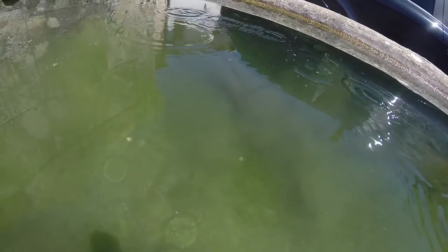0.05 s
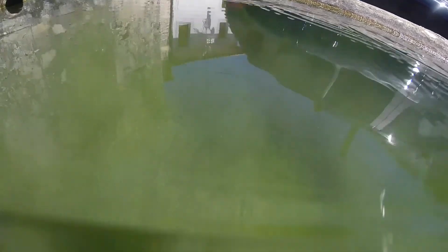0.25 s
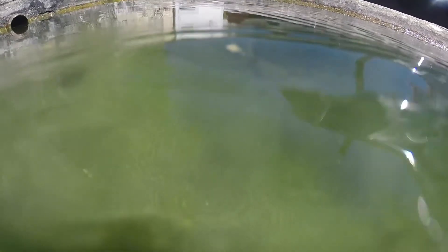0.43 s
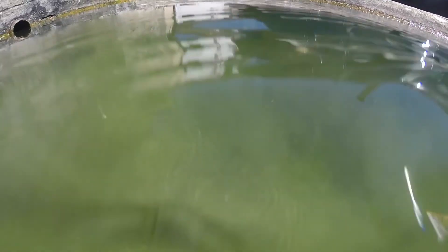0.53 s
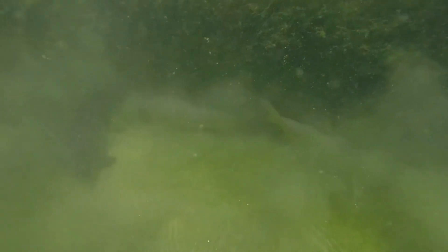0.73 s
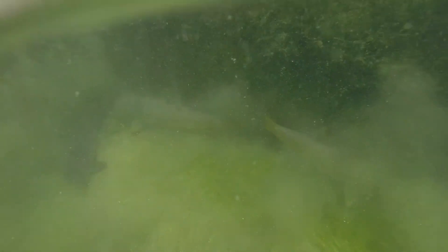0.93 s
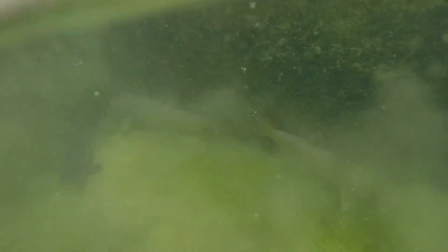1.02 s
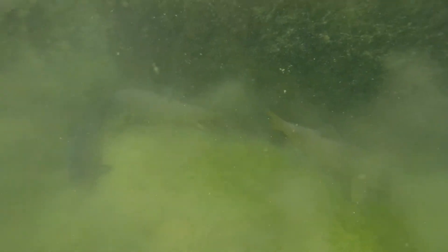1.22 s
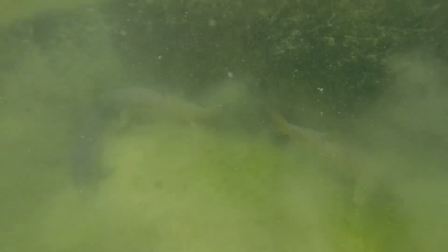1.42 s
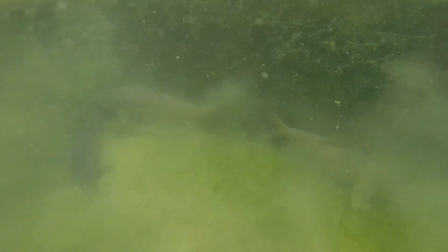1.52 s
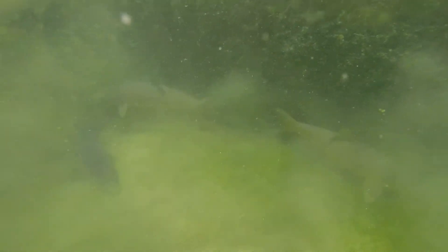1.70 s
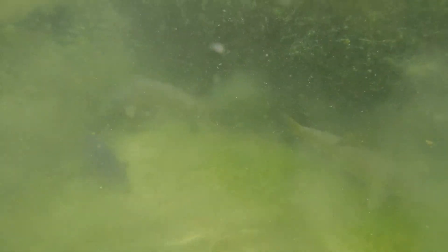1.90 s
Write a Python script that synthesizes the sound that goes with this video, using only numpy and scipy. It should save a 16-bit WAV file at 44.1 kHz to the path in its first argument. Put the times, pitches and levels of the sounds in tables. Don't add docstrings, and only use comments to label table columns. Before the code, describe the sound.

Plastic camera housing being bumped, heard from inside: dull low knocks and small creaky ticks from 0 to 0.25 s, then a cluster of clicks peaking in a very loud, dry double crack at 0.3 s. A faint thin air whistle at 0.4-0.5, a tiny bubble blip at 0.54, a softer knock and clicks at 0.65-0.8, one faint tick at 1.23. Beneath, dark muffled water hush, slight rumble and hiss until about 2 s.

```python
import sys
import numpy as np
from scipy import signal
from scipy.fft import rfft, irfft
from scipy.io import wavfile

SR = 44100
rng = np.random.default_rng(int(sys.argv[2]) if len(sys.argv) > 2 else 0)


def wav_out(sig):
    wavfile.write(sys.argv[1], SR, np.round(np.clip(np.atleast_2d(sig).T, -1, 1) * 32767).astype(np.int16))


def to_linear_factor(level_db):
    exponent = np.asarray(level_db, float) / 20
    return 10 ** exponent


N = 85995


def rms_one(x):
    return x / np.sqrt(np.mean(x ** 2) + 1e-20)


def in_time(rows):
    s, *columns = np.transpose(rows)
    return [np.interp(np.arange(N) / SR, s, column) for column in columns]


def drift(rate_hz):
    r = np.exp(-80 * np.pi * rate_hz / SR)
    white = rng.standard_normal(N // 40 + 2002)
    slow = signal.lfilter([1], [1, -2 * r, r * r], white)[2000:]
    return np.interp(np.arange(N) / 40, np.arange(len(slow)), rms_one(slow))


def ring(clicks, hz, t60):
    r = to_linear_factor(-60 / (t60 * SR))
    w = 2 * np.pi * hz / SR
    return signal.lfilter([0, np.sin(w)], [1, -2 * r * np.cos(w), r * r], clicks)


def bandpass(x, edges_hz):
    return signal.sosfilt(signal.butter(2, edges_hz, "band", fs=SR, output="sos"), x)


def steep_band(x, low_hz, high_hz):
    hz = np.arange(N // 2 + 1) * SR / N
    return irfft(rfft(x) * ((hz >= low_hz) & (hz < high_hz)), N)


def banded_noise(spectrum, patchy_db, rate_hz):
    out, together = 0, drift(rate_hz)
    edges = 18 * 2 ** np.arange(0, 10, 1 / 3)
    white = rng.standard_normal((2, N + SR))
    hz, db = np.transpose(spectrum)
    for k, (low, high) in enumerate(zip(edges, edges[1:])):
        band = bandpass(white[k % 2], [low, high])[SR:]
        level_db = np.interp(np.log(low * high) / 2, np.log(hz), db)
        flicker = .7 * together + drift(rate_hz)
        out = out + band * to_linear_factor(level_db + patchy_db * flicker)
    return rms_one(out)


# (time [s], peak level [dB], centre [Hz], width [octaves], length [s])
BUMP_TICKS = [(.0777, -31.5, 1520, 1.65, 0.0033), (.1486, -35.5, 1250, 0.65, .005),
              (.157, -35, 1770, 0.92, 0.0068), (.183, -40.5, 1380, .6, 0.0074),
              (.188, -49.5, 2330, 0.62, 0.013), (.207, -41, 2390, 0.55, .003),
              (.248, -33.5, 8850, 0.68, 0.0016), (.248, -28.5, 2006, 1.5, 0.018),
              (.2525, -33.5, 4508, 0.63, 0.0038), (.267, -20, 3000, .9, .003),
              (.273, -31, 4970, 1.4, 0.004), (.284, -25, 4130, 1.2, 0.004), (.29, -21, 7630, .3, .001),
              (.29, -15.5, 3400, 0.6, 0.0012), (.2918, -23, 6000, 1.1, 0.0016),
              (.2937, -15, 1415, 1, .00006), (.2996, -13.5, 3016, 0.84, .00006),
              (.2985, -26.5, 3400, 0.38, .0005), (.3026, -21, 2690, .6, .004)]
# (time [s], peak level [dB], centre [Hz], width [octaves], length [s])
LATER_TICKS = [(.416, -68, 5600, .4, .008), (.4294, -44.5, 900, 0.86, 0.0066),
               (.475, -63, 6000, 1.1, 0.0024), (.494, -49, 5460, 0.87, 0.0019),
               (.5023, -43.5, 1240, 1.6, 0.011), (.5445, -56, 2270, 0.43, 0.0024),
               (.563, -47.5, 1800, 1.27, 0.0073), (.601, -39, 1500, 1.26, 0.0037),
               (.616, -44, 1322, .9, 0.0013), (.649, -34.5, 902, 1.1, 0.0048),
               (.659, -30, 880, 0.68, 0.0078), (.6732, -33, 8020, 0.37, 0.0025),
               (.6732, -32, 4900, 0.33, 0.0017), (.67, -35.5, 1520, 0.66, 0.01),
               (.688, -41, 1500, 0.94, 0.018), (.7477, -46.5, 1110, 0.54, 0.0045),
               (.784, -29, 3060, 1.5, 0.00065), (1.2272, -43.5, 2930, 1.1, 0.003)]
# (pitch [Hz], level [dB], t60 [s])
SHELL_MODES = [(330, -3, .02), (620, -2, .009), (900, -2, .012), (1200, 0, .014), (1500, -3, .008),
               (1820, -8, .025), (2200, -2, .011), (2650, -1, .01), (3450, 1, .009), (4200, -1, .009),
               (4900, -3, .008), (5800, -8, .011), (7200, 0, .007), (9900, -4, .006)]
SLIPS_PER_S, FIRST_SLIP = 6300, 2.5
SKIRT_DB, SHELL_TOP_HZ = -18, 17000
CRACK_DB, CRACK_S = -28.5, .004


def housing(table, size=4000):
    out, t = np.zeros(N + size), np.arange(size) / SR
    for s, db, hz, octaves, length in table:
        luck, sizes = rng.random(size), rng.standard_normal(size)
        share_db = rng.normal(0, 2, len(SHELL_MODES))
        slips = (luck < SLIPS_PER_S / SR) * sizes + FIRST_SLIP * (t == 0)
        slips = slips * np.exp(-(t / length) ** 2)
        tick = np.zeros(size)
        for (mode_hz, mode_db, t60), own_db in zip(SHELL_MODES, share_db):
            off_centre_db = 6 * (np.log2(mode_hz / hz) / octaves) ** 2
            tick += to_linear_factor(mode_db + own_db - off_centre_db) * ring(slips, mode_hz, t60)
        edges = np.clip(hz * 2. ** np.array([-octaves, octaves]), 50, SHELL_TOP_HZ)
        tick = bandpass(tick, edges) + to_linear_factor(SKIRT_DB) * tick
        crack = to_linear_factor(CRACK_DB) * np.exp(-t / CRACK_S) * np.diff(slips, prepend=0)
        start = int(s * SR)
        out[start:start + size] += to_linear_factor(db) * (tick / np.abs(tick).max() + crack)
    out = out[:N] + to_linear_factor(-62) * ring(out[:N], hz=1815, t60=.2)
    return signal.sosfilt(signal.butter(2, SHELL_TOP_HZ, fs=SR, output="sos"), out)


# (time [s], peak level [dB], pitch [Hz], rise [s], fall [s])
BODY_KNOCKS = [(.001, -32, 41.8, 0.0046, 0.078), (0.025, -40, 27, 0.01, 0.0067),
               (0.0491, -19, 296, 0.0054, 0.0053), (0.055, -22, 307, 0.006, 0.0017),
               (0.2909, -18, 210, 0.0022, 0.001), (.072, -32, 344, .008, .025),
               (0.093, -32.5, 55.4, 0.0053, 0.04), (.127, -33, 323, 0.015, 0.0077),
               (0.15, -22, 130, 0.0034, 0.0058), (.156, -28.5, 324, 0.0035, 0.0039),
               (.112, -37, 380, 0.0051, .01), (.178, -38.5, 350, 0.0058, .012),
               (.173, -31.5, 50.3, 0.0052, 0.024), (.238, -23, 144.4, 0.002, 0.015),
               (0.231, -18, 50.4, 0.056, 0.0026), (0.298, -25, 139.5, .004, 0.0093),
               (0.47, -45, 306, 0.0039, 0.0033), (0.506, -43.5, 124, 0.0062, 0.012),
               (0.46, -41, 39.5, 0.013, 0.014), (0.659, -25, 256, 0.0015, 0.0047),
               (0.657, -22, 44.5, 0.015, 0.015), (0.698, -30.5, 122, 0.0017, 0.0046),
               (0.748, -39, 110, 0.0065, 0.013)]
# (time [s], peak level [dB], pitch [Hz], rise [s], fall [s])
PANEL_SNAPS = [(.0777, -32.5, 1870, 0.0012, 0.0029), (.0777, -34, 1230, 0.0012, 0.0038),
               (.0777, -37, 930, 0.00089, 0.0054), (.078, -42.5, 2480, .001, 0.0034),
               (.158, -43.5, 2500, 0.0025, 0.0031), (.158, -40, 1240, .002, 0.0045),
               (.184, -41, 1220, .003, .012), (.267, -22, 2900, 0.00028, .001),
               (.267, -37, 9900, .0004, .0006), (.269, -43, 6980, .001, .001),
               (.2757, -28.5, 7400, .0003, 0.00032), (.29, -14, 7620, 0.00043, 0.00046),
               (.29362, -4, 1960, 0.00035, 0.00038), (.294, -14.5, 1136, 0.0017, 0.0034),
               (.29935, -1, 3120, .0004, .00025), (.3002, -1, 3357, 0.00046, 0.00042),
               (.3012, -16.5, 2370, .001, .002), (.302, -25.5, 4670, .0008, 0.0013),
               (.3005, -24, 1207, .001, .0025), (.301, -40, 10440, .001, 0.00076),
               (.305, -52, 5690, .002, .004), (.306, -43.5, 1810, .008, .007),
               (.31, -43, 782, 0.0045, .005), (.31, -45, 1260, .005, .005),
               (.6732, -21, 4360, 0.00056, 0.00064), (.6732, -21, 6880, 0.00051, 0.00044),
               (.6745, -30, 6730, 0.00073, .0015), (.6733, -36.5, 5450, 0.0011, 0.0016),
               (.6732, -39, 3830, 0.00041, .0015), (.784, -29.5, 2117, .001, .0025),
               (.784, -33, 3570, 0.00028, 0.0015), (.784, -37.5, 5840, .0005, .0017),
               (.784, -41.5, 7617, 0.0014, .0012)]
# (time [s], peak level [dB], pitch [Hz], rise [s], fall [s])
MORE_SNAPS = [(.2525, -32, 5000, .0006, .001), (.256, -30.5, 1800, .002, .002),
              (.2695, -29.5, 1900, .001, .001), (.274, -28, 2000, .0002, .0002),
              (.2757, -20.5, 2600, .0001, .00008), (.285, -24, 4100, .0004, .0004),
              (.288, -26.5, 1150, .002, .004), (.3275, -52.5, 1815, .008, .025),
              (.312, -52, 2670, .004, .02), (.417, -58.5, 5500, .002, .003), (.475, -58, 5900, .001, .002),
              (.511, -58, 6800, .001, .002), (.516, -51, 1200, .002, .003), (.6487, -32.5, 190, .002, .003),
              (.6578, -27.5, 330, .002, .002), (.667, -38.5, 850, .002, .002), (.67, -37, 1250, .002, .003),
              (.6745, -35, 2050, .001, .001), (.72, -41.5, 150, .005, .02), (1.2205, -45, 1400, .001, .003),
              (1.2265, -41, 1420, .001, .003), (1.228, -45, 2950, .001, .002),
              (1.2273, -53, 4500, .0005, .002), (1.2273, -53, 6000, .0005, .002)]


def knocks(table):
    out = np.zeros(N)
    for s, db, hz, rise, fall in table:
        t = np.maximum(np.arange(N) / SR - s, 0)
        swell = np.sin(np.pi / 2 * np.minimum(t / rise, 1)) ** 2
        decay = np.exp(-np.maximum(t - rise, 0) / fall)
        out += to_linear_factor(db) * swell * decay * np.sin(2 * np.pi * hz * t)
    return out


# (time [s], peak level [dB], pitch [Hz], length [s])
BUBBLE_PINGS = [
    (0.5392, -27, 2714, 0.0014),
    (0.54, -32.5, 2143, 0.0041),
]


def bubble():
    out = np.zeros(N)
    for s, db, hz, length in BUBBLE_PINGS:
        t = np.clip(np.arange(N) / SR - s, 0, length)
        out += to_linear_factor(db) * np.sin(np.pi * t / length) * np.sin(2 * np.pi * hz * t)
    return out


# (time [s], pitch [Hz], level [dB])
SEAL_WHISTLE = [
    (.37, 4700, -90),
    (.39, 4820, -73),
    (.45, 4820, -72),
    (.485, 4750, -78),
    (.5, 4600, -68),
    (.53, 4400, -90),
]


def whistle():
    hz, db = in_time(SEAL_WHISTLE)
    flutter = drift(110)
    return to_linear_factor(db) * flutter * np.sin(2 * np.pi * np.cumsum(hz) / SR)


# (time [s], level [dB])
POLE_MOTION = [
    (0.0, -59.5),
    (0.184, -37),
    (0.314, -45.5),
    (0.406, -65),
    (0.662, -53),
    (0.782, -51),
    (0.878, -55.5),
    (1.796, -60.5),
    (1.95, -57),
]
# (frequency [Hz], level [dB per Hz])
RUMBLE_COLOUR = [(20, -9), (50, -2), (90, -8), (150, -6), (330, -14.5), (550, -29.5), (1000, -24.5),
                 (1800, -26.5)]


def handling_rumble():
    motion_db, = in_time(POLE_MOTION)
    top_db = motion_db.max()
    level_db = top_db + 0.5 + 0.77 * (motion_db - top_db)
    return to_linear_factor(level_db) * banded_noise(RUMBLE_COLOUR + [(5000, -70)], patchy_db=2, rate_hz=15)


def duck_db():
    t = np.arange(N) / SR - .305
    return -9 * (t > 0) * np.exp(-(t / 0.37) ** 2)


PORT_HISS_HZ, PORT_HISS_DB = (9800, 10450), -89
AIR_HZ, AIR_DB = (12800, 15300), -87
# (frequency [Hz], level [dB per Hz])
HUSH_COLOUR = [(20, -26), (116, 1.5), (277, -6.5), (319, -5), (949, -14.5), (1860, -13), (10200, -37),
               (14000, -45.5), (16000, -55)]


def water_hush():
    hush = to_linear_factor(-53 + duck_db()) * banded_noise(HUSH_COLOUR, patchy_db=.8, rate_hz=4.5)
    return steep_band(hush, 0, AIR_HZ[0])


# (time [s], level [dB])
AIR_GATE = [
    (0, -30),
    (.095, -30),
    (.1, 0),
    (.3, 0),
    (.31, -30),
    (.73, -30),
    (.76, -6),
    (.95, 0),
    (1.95, 0),
]


def circuit_hiss():
    white = rng.standard_normal(N)
    gate_db, = in_time(AIR_GATE)
    port = to_linear_factor(PORT_HISS_DB) * rms_one(steep_band(white, *PORT_HISS_HZ))
    air = to_linear_factor(AIR_DB + gate_db) * rms_one(steep_band(white, *AIR_HZ))
    return to_linear_factor(duck_db()) * (port + air)


def scene():
    ticks = housing(BUMP_TICKS) + housing(LATER_TICKS)
    swings = knocks(BODY_KNOCKS) + knocks(PANEL_SNAPS) + knocks(MORE_SNAPS)
    seal = bubble() + whistle()
    background = handling_rumble() + water_hush() + circuit_hiss()
    return (ticks + swings + seal + background)[None]


def low_pass(x):
    return signal.sosfilt(signal.butter(12, 16340, fs=SR, output="sos"), x)


def record(dry):
    top_cut = signal.cheby2(10, 60, 16100, fs=SR, output="sos")
    mix = signal.sosfilt(top_cut, np.clip(dry, -1, 1))
    return low_pass(mix)


dry = scene()
out = record(dry)
wav_out(out)
```